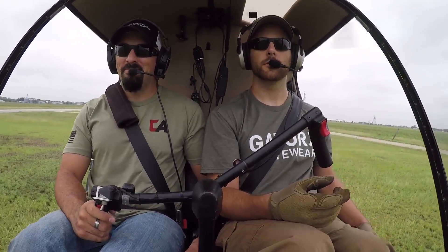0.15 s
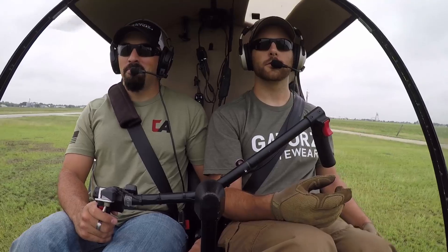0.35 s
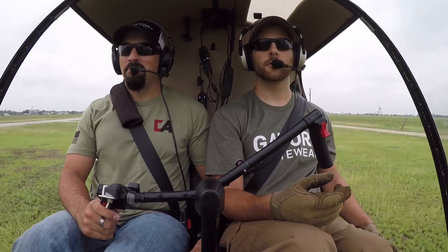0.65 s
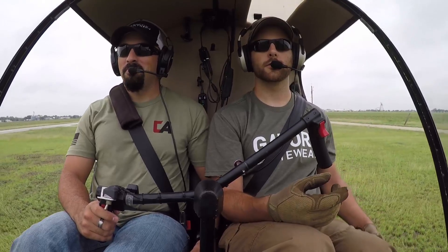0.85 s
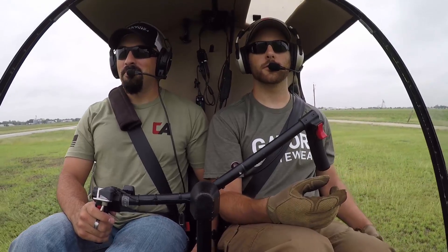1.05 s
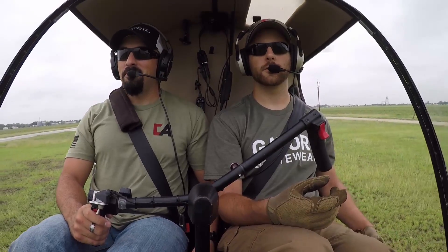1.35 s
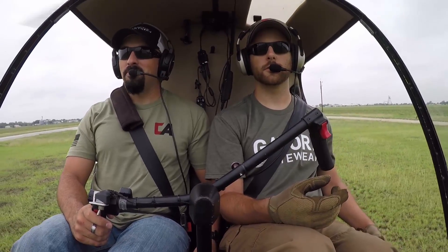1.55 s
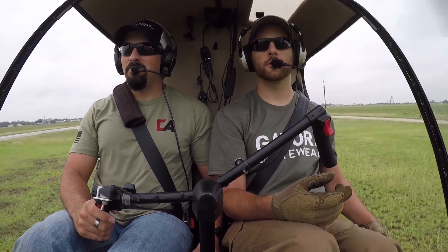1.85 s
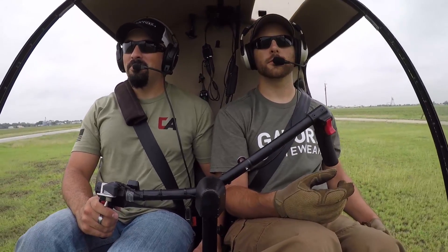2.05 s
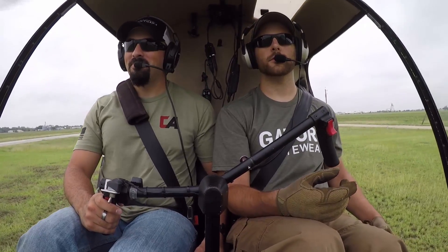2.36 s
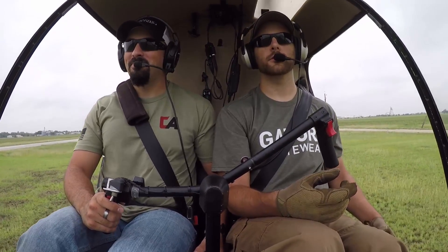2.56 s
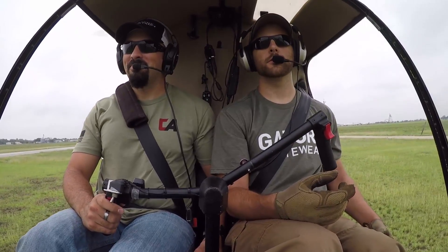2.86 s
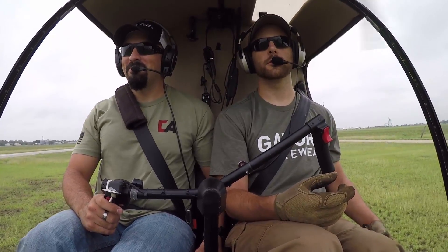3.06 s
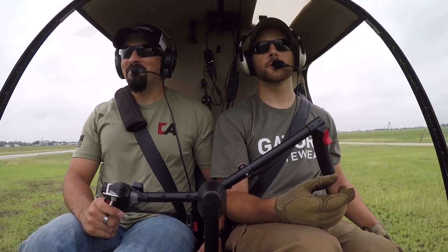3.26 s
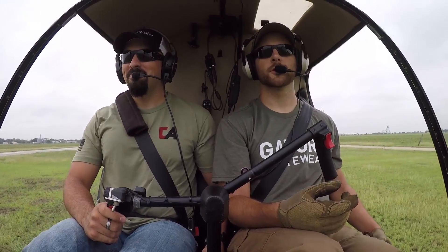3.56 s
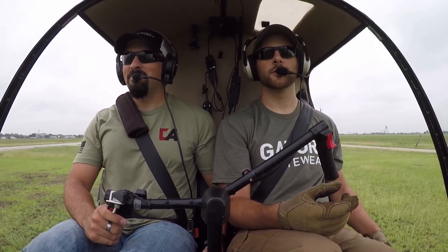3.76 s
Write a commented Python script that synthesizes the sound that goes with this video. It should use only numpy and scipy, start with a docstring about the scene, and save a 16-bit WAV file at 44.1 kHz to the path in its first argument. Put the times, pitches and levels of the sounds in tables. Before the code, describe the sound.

Steady deep helicopter engine and rotor drone inside a small cabin, swelling slightly once early on.

```python
"""Inside the cabin of a small hovering helicopter, heard by a camera in a closed housing. A four-cylinder piston
engine drones as a harmonic series on its cycle; main rotor, drive shaft and tail rotor, geared to it, add series
of their own. Downwash and exhaust roar as noise coloured by the cabin, and the microphone hisses.
The whole sound swells for a moment near one second."""
import sys
import numpy as np
from scipy import signal
from scipy.fft import rfft, irfft, next_fast_len
from scipy.io import wavfile
from scipy.ndimage import uniform_filter1d, map_coordinates

SR = 44100
rng = np.random.default_rng(int(sys.argv[2]) if len(sys.argv) > 2 else 0)


def to_wav(s):
    """Save 16-bit WAV."""
    ch = np.atleast_2d(s).T  # columns
    pcm = np.round(np.clip(ch, -1, 1) * 32767)  # PCM
    wavfile.write(sys.argv[1], SR, pcm.astype(np.int16))


N = 171990  # samples

# Gearing: main blade passes, shaft turns and tail blade passes per engine cycle
MAIN_RATIO, SHAFT_RATIO, TAIL_RATIO = .795, 1.6925, 5.081


def amp(db):
    """Decibel law: level [dB] to amplitude ratio."""
    return 10 ** (np.asarray(db) / 20)


def unit(x):
    """Normalisation to an rms value of 1."""
    return x / np.sqrt(np.mean(x ** 2) + 1e-20)


def along(points, hz):
    """Spectral interpolation: the value columns of a table, linear over log frequency."""
    point_hz, *columns = np.transpose(points)
    return np.array([np.interp(np.log(hz + 1), np.log(point_hz + 1), column) for column in columns])


def curve(rows):
    """Linear interpolation in time of (time [s], value) rows, one value per sample."""
    return np.interp(np.arange(N) / SR, *np.transpose(rows))


def wobble(rate):
    """Slow random modulation: normal random knots, rate of them a second, joined by straight lines."""
    knots = rng.standard_normal(int(N * rate / SR) + 4)
    return map_coordinates(knots, [np.arange(N) * rate / SR], order=1)


def filtered(x, response):
    """Linear filtering: the spectrum of x times a complex response of frequency."""
    size = next_fast_len(N + SR // 2)
    hz = np.fft.rfftfreq(size, 1 / SR)
    return irfft(rfft(x, size) * response(hz), size)[..., :N]


# Phase difference between the two microphone ports: (frequency [Hz], lead of left over right [rad])
PORT_LEAD = [(0, 0.087), (520, -0.14), (1030, 1.0), (1380, -0.088), (1720, 0.58), (2070, -0.31),
             (2500, -0.34), (3100, 0.0), (15000, -0.0)]


def port_phases(hz):
    """Interaural-type phase difference: half the lead to the left port, half as lag to the right."""
    return .5 * along(PORT_LEAD, hz) * [[1], [-1]]


# Coherence of noise at the two ports: (frequency [Hz], left-right correlation [-1 to 1])
PORT_COHERENCE = [(20, .995), (45, .995), (90, .998), (200, 1), (380, 0.96), (690, 0.9), (1200, 0.39),
                  (2300, 0.84), (4100, 1), (5500, 0.86), (7200, 1), (7800, 1), (15000, 1)]


def port_mix(hz):
    """Mid-side coherence: gains cos and sin of half the angle whose cosine is the correlation."""
    half_angle = np.arccos(np.clip(along(PORT_COHERENCE, hz)[0], -1, 1)) / 2
    return np.array([np.cos(half_angle), np.sin(half_angle)])


def rush(spectrum, patchy_db):
    """Shaped random noise: stereo, rms 1, its gain varying in patches of time and frequency by patchy_db rms."""
    cells = signal.stft(rng.standard_normal((2, N)), nperseg=512)[2]
    patches = uniform_filter1d(rng.standard_normal(cells.shape[1:]), size=4, axis=0)  # over frequency
    patches = uniform_filter1d(patches, size=10, axis=1)  # over time
    noise = signal.istft(cells * amp(patchy_db * unit(patches)), nperseg=512)[1][:, :N]
    mid, side = filtered(noise, port_mix)
    ports = np.array([mid + side, mid - side])
    return unit(filtered(ports, lambda hz: amp(along(spectrum, hz)) * np.exp(1j * port_phases(hz))))


def tones(angle, rows, start, waver_db, slip, spread=0):
    """Fourier synthesis on a turning angle; above the 8th multiple level waver and phase scatter grow.

    start [rad], slip [rad per multiple, rms at the knots], spread [rad per multiple squared]."""
    out = np.zeros((2, N))
    angle = angle + slip * wobble(3.08)
    mean_hz = angle[-1] / (2 * np.pi * N / SR)
    for k, left_db, right_db in rows:
        loose = np.clip(k / 8 - 1, 0, 1)  # 0 up to multiple 8, 1 from multiple 16
        scatter = 2 * np.pi * loose * rng.random()
        phase = k * angle + start + spread * k * k + scatter
        peak = np.sqrt(2) * amp(waver_db * (.15 + loose) * wobble(8))
        out += amp([[left_db], [right_db]]) * peak * np.cos(phase + port_phases(k * mean_hz))
    return out


def overtones(levels):
    """Harmonic numbering: rows (multiple, left [dB], right [dB]) counted from one."""
    return [(k + 1, *row) for k, row in enumerate(levels)]


# Spectrum of the microphone's own noise: (frequency [Hz], relative spectral level [dB])
HISS_SPECTRUM = [(20, -17), (1000, 2), (8000, 0), (15300, -0.5)]


def hiss():
    """Self-noise: broadband random noise at -59 dB rms before the common swell."""
    return amp(-59) * rush(HISS_SPECTRUM, patchy_db=0.53)


# Roar as coloured by the cabin: (frequency [Hz], left relative level [dB], right relative level [dB])
CABIN_SPECTRUM = [(20, -12, -17), (40, -13, -27), (56.3, -6, -13), (73.4, -34.5, -31), (95, -10, -2.5),
                  (124, -8, -16), (226, -7, -8), (280, -5.5, -3), (354, -15, -12), (402, -7.5, -1.5),
                  (462, -10, -6.5), (537, -17, -6), (620, -20, -4.5), (723, -17, -7.5), (768, -11.5, -4.5),
                  (790, -6.5, -11), (882, -15, -9), (1010, -18.5, -18.5), (1290, -26, -22),
                  (1315, -21.5, -18), (1450, -24.5, -24.5), (2070, -30, -29.5), (2180, -32.5, -35.5),
                  (3000, -45, -41.5), (4500, -65, -72)]
# Course of the roar before throb and common swell: (time [s], level [dB])
ROAR_LEVEL = [(0, -43), (.8, -44), (1.6, -43.5), (2.3, -44.5), (3, -44), (3.9, -43.5)]


def roar(cycle):
    """Resonance and amplitude modulation: downwash and exhaust noise, throbbing with blades and crank."""
    blade_beat = .16 * np.cos(MAIN_RATIO * cycle)
    crank_beat = .12 * np.cos(2 * cycle)  # two crank turns per engine cycle
    throb = 1 + blade_beat + crank_beat
    return amp(curve(ROAR_LEVEL)) * throb * rush(CABIN_SPECTRUM, patchy_db=1.1)


# Harmonics of the main blade passage, one row each from the first: (left level [dB], right level [dB])
MAIN_HARMONICS = [(-67, -66), (-75, -62), (-72, -57), (-57, -53), (-81, -70), (-67, -57)]


def main_rotor(cycle):
    """Blade-passage tone: a harmonic series, its phase unsettled by the rotor's own wake."""
    return tones(MAIN_RATIO * cycle, overtones(MAIN_HARMONICS), 0, waver_db=5, slip=.3)


# Harmonics of the shaft rotation, one row each from the first: (left level [dB], right level [dB])
SHAFT_HARMONICS = [(-67, -76), (-56.5, -54)]


def drive_shaft(cycle):
    """Rotational tone: a geared shaft sounds at its turning rate and twice that rate."""
    return tones(SHAFT_RATIO * cycle, overtones(SHAFT_HARMONICS), 0, waver_db=6, slip=.2)


# Harmonics of the tail blade passage, one row each from the first: (left level [dB], right level [dB])
TAIL_HARMONICS = [(-54, -53), (-71, -66), (-65, -62), (-85, -63), (-72, -64), (-85, -80), (-85, -80),
                  (-68, -66)]


def tail_rotor(cycle):
    """Blade-passage tone: the faster geared rotor gives a higher, steadier harmonic series."""
    return tones(TAIL_RATIO * cycle, overtones(TAIL_HARMONICS), 3.0, waver_db=2, slip=.08)


# Engine orders: (multiple of the engine cycle, left level [dB], right level [dB])
ENGINE_ORDERS = [(1, -72, -70), (2, -60, -58), (3, -46, -45), (4, -30, -29), (5, -54, -53), (6, -67, -64),
                 (8, -45, -43), (9, -70, -70), (10, -68, -62), (11, -64, -62), (12, -59, -57),
                 (13, -54, -51), (14, -60, -56), (15, -72, -69), (16, -70, -65), (17, -70, -65),
                 (18, -59, -55), (19, -59, -59), (20, -59, -56), (21, -63, -62), (22, -65, -59),
                 (23, -70, -62), (25, -68, -60), (26, -76, -66), (27, -71, -58), (28, -76, -56),
                 (29, -78, -61), (31, -66, -62), (32, -68, -63), (33, -67, -61), (34, -56, -59),
                 (35, -65, -58), (36, -67, -65), (37, -80, -68), (38, -65, -89), (39, -70, -70),
                 (40, -66, -66), (41, -68, -70), (42, -75, -69), (43, -72, -74), (44, -84, -77),
                 (45, -76, -75), (46, -82, -80), (47, -77, -73), (48, -77, -86), (49, -74, -73),
                 (50, -75, -77), (51, -80, -92), (52, -79, -82), (54, -80, -81), (57, -92, -78),
                 (59, -81, -92), (60, -76, -75), (61, -73, -71), (62, -89, -83), (63, -79, -77),
                 (64, -87, -80), (65, -85, -81), (66, -79, -79), (68, -80, -80), (70, -82, -82),
                 (72, -82, -81), (74, -82, -92)]


def engine(cycle):
    """Periodic excitation: four firings a cycle, unequal by cylinder, so other multiples than the 4th sound too."""
    # spread stands for dispersion in the exhaust pipe
    return tones(cycle, ENGINE_ORDERS, start=5.45, waver_db=2, slip=.008, spread=1.9)


# Engine speed: (time [s], rate [engine cycles per second])
ENGINE_SPEED = [(0.45, 22.098), (0.95, 22.101), (1.45, 22.143), (1.95, 22.184), (2.45, 22.188),
                (2.95, 22.178), (3.45, 22.174)]


def engine_cycle():
    """Phase as the integral of frequency: the engine's angle [rad], 2 pi per cycle."""
    return 2 * np.pi * np.cumsum(curve(ENGINE_SPEED)) / SR


# Common swell, of which only the departure from its mean acts: (time [s], level [dB])
SWELL = [(0, -62), (.6, -62), (.8, -61.5), (.98, -59.5), (1.2, -59.2), (1.5, -60.3), (1.72, -62.5),
         (2.5, -62.5), (3.9, -62.2)]


def scene():
    """Superposition: all sources add and share one swelling level."""
    cycle = engine_cycle()
    swell_db = curve(SWELL)
    background = hiss() + roar(cycle)
    rotors = main_rotor(cycle) + drive_shaft(cycle) + tail_rotor(cycle)
    return amp(swell_db - swell_db.mean()) * (background + rotors + engine(cycle))


def record(dry):
    """Band limitation: the camera keeps nothing from 15330 Hz up."""
    return filtered(dry, lambda hz: hz < 15330)


dry = scene()
out = record(dry)
to_wav(out)
```